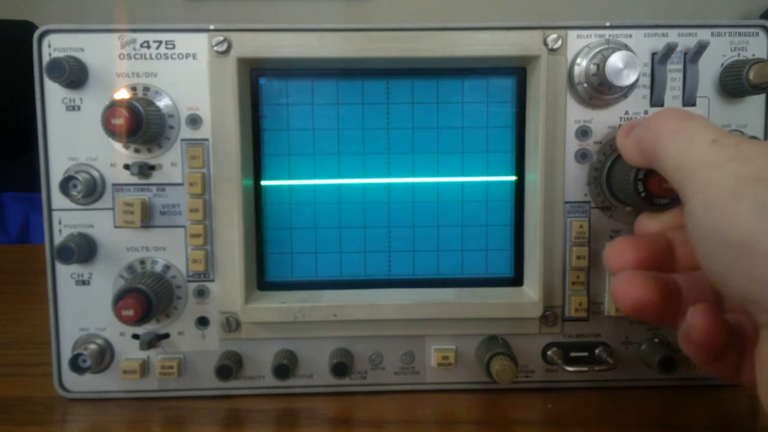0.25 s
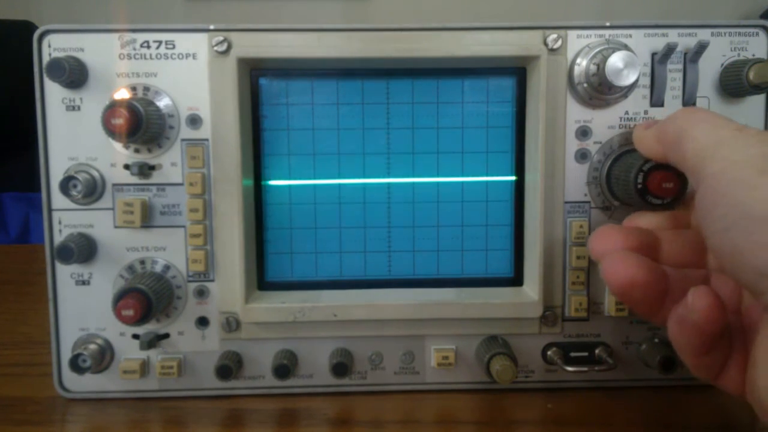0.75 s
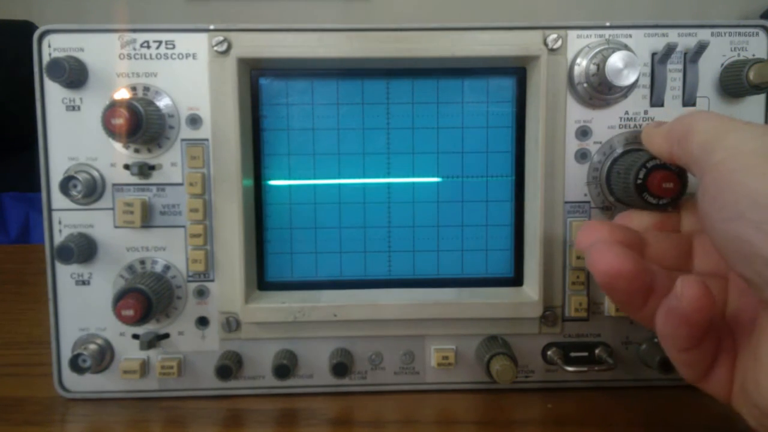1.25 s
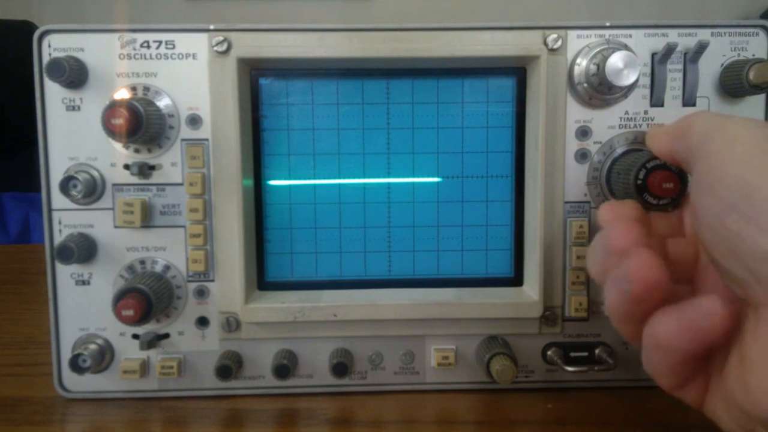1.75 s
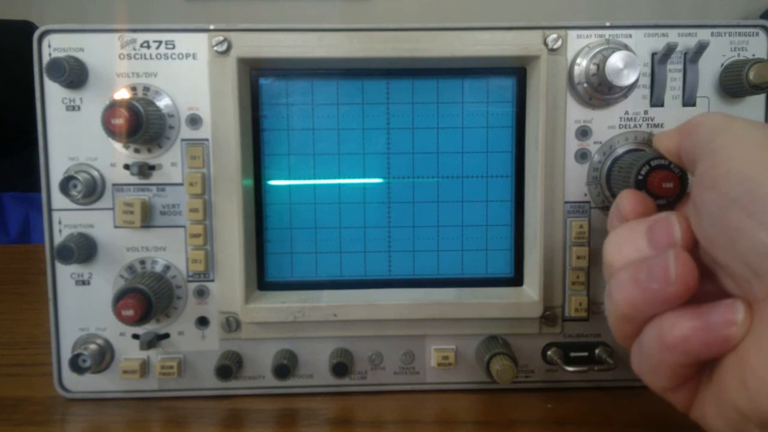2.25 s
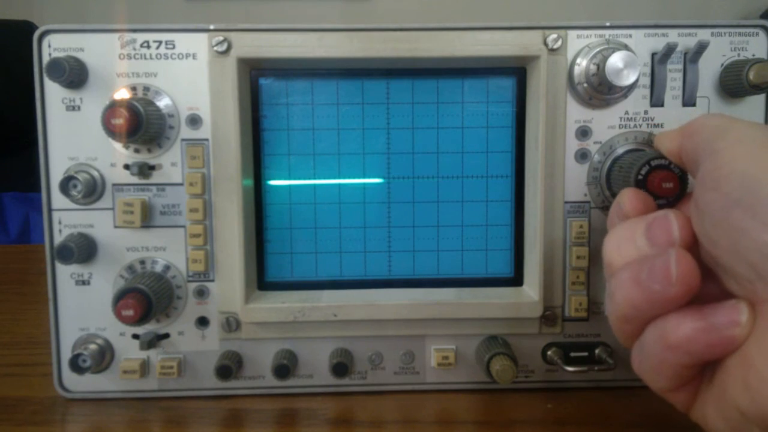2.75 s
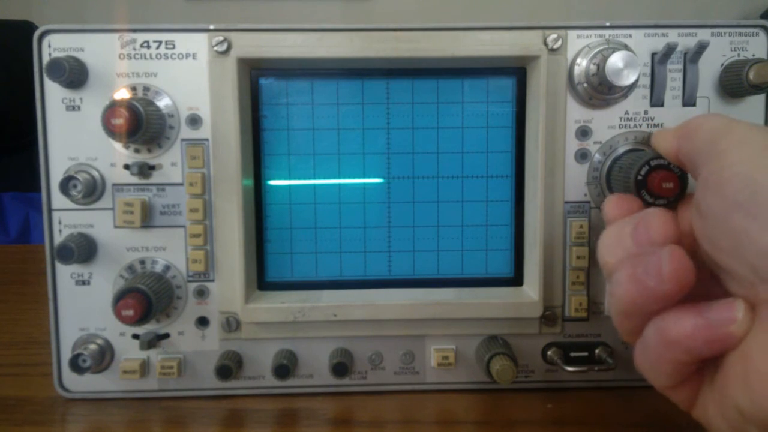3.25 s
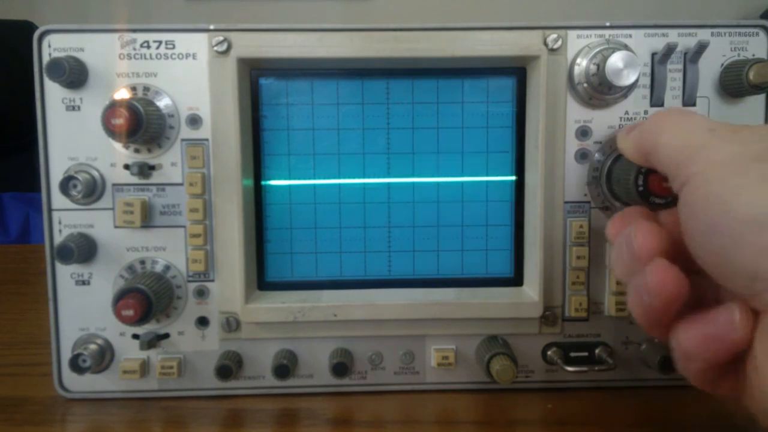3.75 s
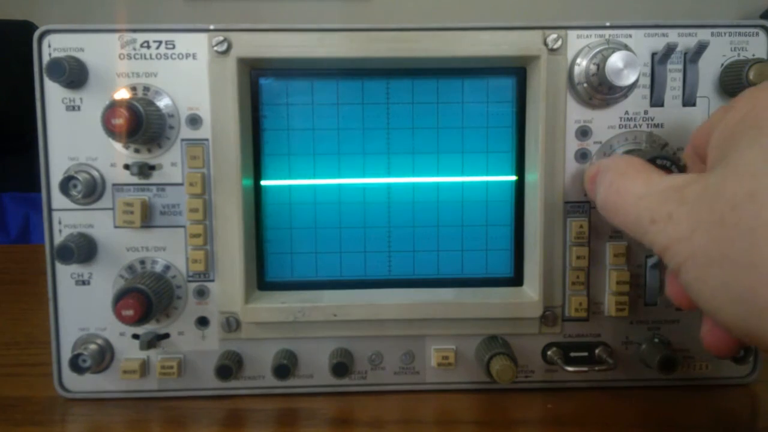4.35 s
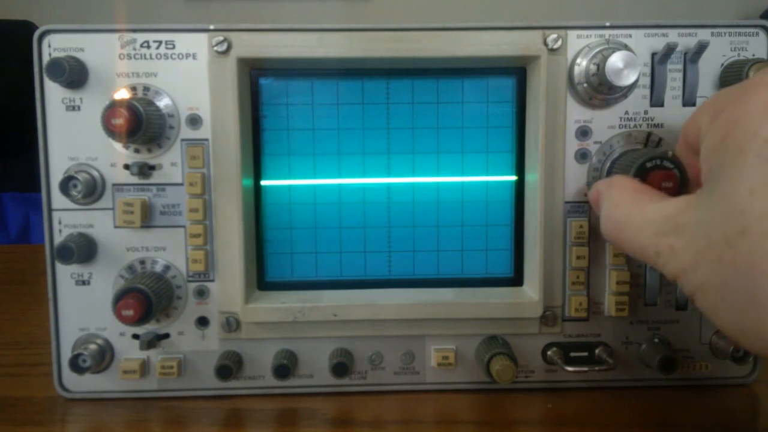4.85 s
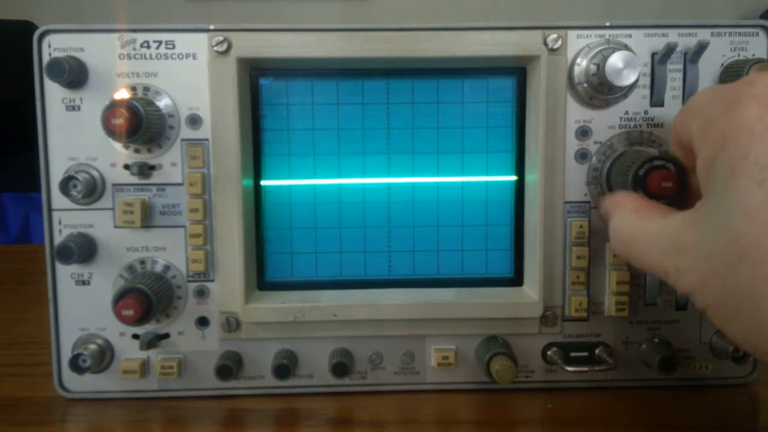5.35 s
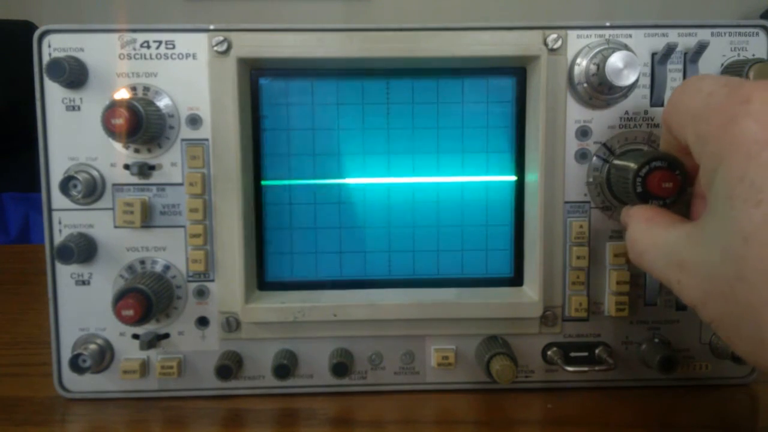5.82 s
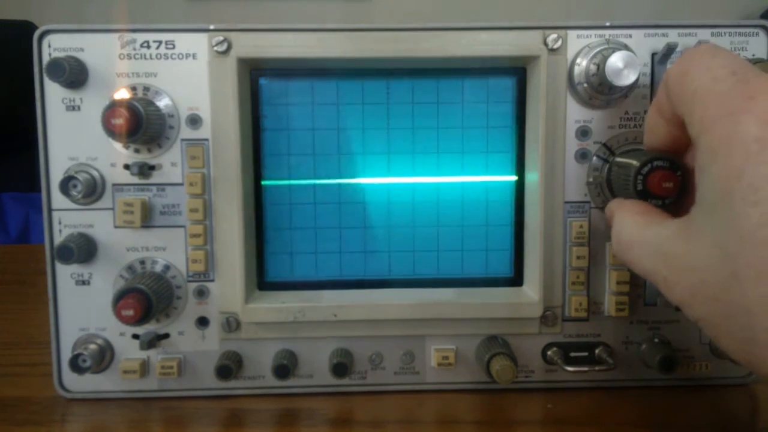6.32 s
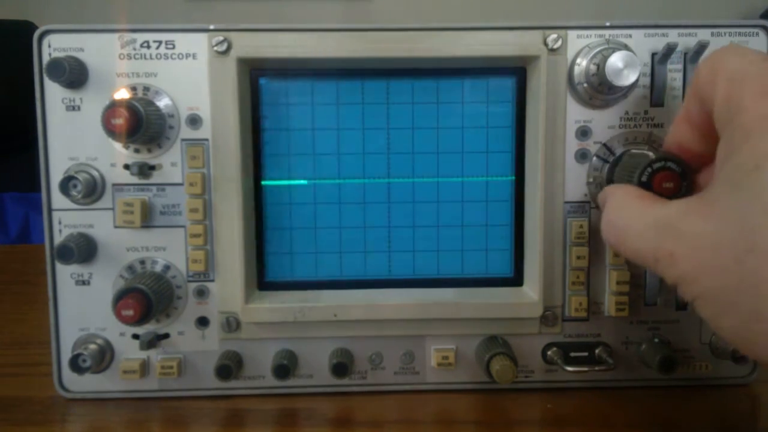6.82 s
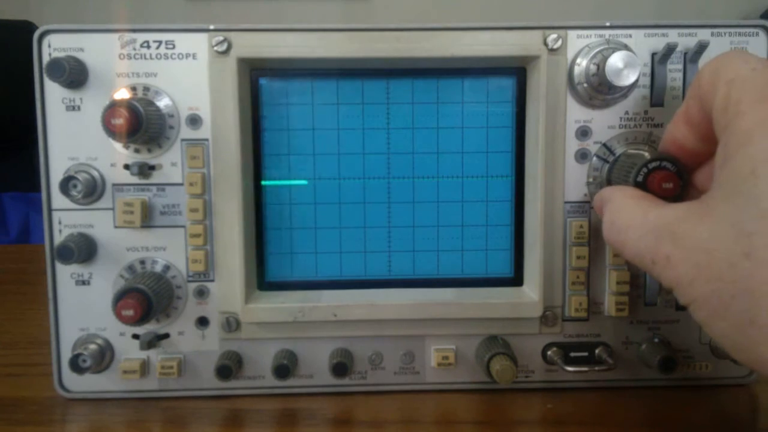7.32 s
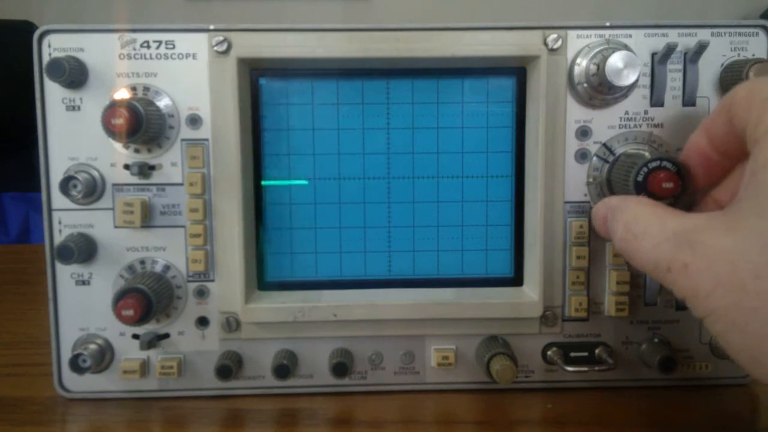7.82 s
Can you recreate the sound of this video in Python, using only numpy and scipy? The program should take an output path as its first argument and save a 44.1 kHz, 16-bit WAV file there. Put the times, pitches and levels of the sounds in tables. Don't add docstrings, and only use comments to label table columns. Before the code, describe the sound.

A soft, steady fan hum with gentle airy noise runs throughout, and a pendulum clock ticks faintly across a small room about every half second. Close to the microphones, a stepped knob snaps hard and bright at 0.1, 0.3, 0.5, 0.8 and 1.1 seconds, the first leaving a brief springy metallic ring, then once more at 2.2. A gap follows, with tiny finger ticks around 3.3 to 3.7. From 3.7 to 4.3 seven steps run back quickly, each a short rattle of spring and contacts, ringing the panel and thumping the hollow case. Slower, similar clunky clicks continue from 4.5 to 5.9, irregularly two to five a second. A softer click comes at 6.2, light fumbling taps near 6.5, then two quick, thinner snaps around 6.8. Only small nail and knob ticks remain at 7.3 to 7.6, over the fan and clock until the end at about 8 seconds.

```python
import sys
import numpy as np
from scipy import signal
from scipy.fft import rfft, irfft, next_fast_len
from scipy.io import wavfile
from scipy.ndimage import uniform_filter1d, map_coordinates

SR = 44100
rng = np.random.default_rng(int(sys.argv[2]) if len(sys.argv) > 2 else 0)


def attenuation_scalar(level_db):
    decades = np.asarray(level_db, float) / 20
    return 10 ** decades


def waveform_to_disk(signal):
    frames = np.transpose(np.atleast_2d(signal))
    scaled = np.clip(frames, -1, 1) * 32767
    samples = np.round(scaled).astype(np.int16)
    wavfile.write(sys.argv[1], SR, samples)


N = 356328
LONG = 16384
LEAD_MS = 18

# pitch_hz, width_hz, level_db
SPRING = [(2210, 24, 0), (2290, 20, 0), (2380, 24, -2)]


def unit(x):
    return x / np.sqrt(np.mean(x ** 2) + 1e-20)


def peak(x, db):
    return x * attenuation_scalar(db) / np.sqrt(uniform_filter1d(x ** 2, size=88).max())


def along(points, hz):
    f, v = np.transpose(points)
    return np.interp(np.log(hz + 1), np.log(f + 1), v)


def filtered(x, response):
    m = next_fast_len(x.shape[-1] + 8192)
    spectrum = rfft(x, m) * response(np.fft.rfftfreq(m, 1 / SR))
    return irfft(spectrum, m)[..., :x.shape[-1]]


def impulse(s):
    return 1. * (np.arange(LONG) == round(s * SR))


def modes(table, scatter_db=0):
    gains = attenuation_scalar(scatter_db * rng.standard_normal(len(table)))

    def response(f):
        total = 0
        for k, (centre, width, db) in enumerate(table):
            resonance = 1j * f * width / (centre * centre - f * f + 1j * f * width)
            total = total + (-1) ** k * gains[k] * attenuation_scalar(db) * resonance
        return total
    return response


def spread(pair, alike):
    def mid_side(hz):
        turn = np.arccos(np.clip(along(alike, hz), -1, 1)) / 2
        return np.array([np.cos(turn), np.sin(turn)])
    mid, side = filtered(pair, mid_side)
    return np.array([mid + side, mid - side])


def add(track, s, sound):
    start = round(s * SR)
    track[:, max(start, 0):start + LONG] += sound[:, max(-start, 0):max(N - start, 0)]


def room(x, plain, wet_db, early_db, gap_s=0.0039, live=1):
    # pitch_hz, t60_s
    reverb = [(150, 0.59), (400, 0.14), (1040, 0.28), (2760, 0.27), (7280, 0.25), (10000, 0.22),
              (12500, 0.19), (16000, 0.18)]
    # pitch_hz, likeness
    tail_alike = [(100, 0.45), (500, 0.93), (2000, 0.99), (5000, 0.9), (9000, 0.39), (14000, .4)]
    # delay_ms, level_db
    walls = [(9.6, -6.5), (13, -15), (16.5, -6.5), (19, -24), (23, -5), (28, -15.5)]
    hz, t, z = signal.stft(rng.standard_normal((2, LONG)), SR, nperseg=256)
    t60 = live * along(reverb, hz)[:, None]
    decay = attenuation_scalar(-60 * t / t60) + attenuation_scalar(-24 - 60 * t / (2.2 * t60))
    tail = signal.istft(z * decay, SR, nperseg=256)[1][:, :LONG]
    tail = tail * (1 - np.exp(-(np.arange(LONG) / SR / gap_s) ** 3))
    tail = spread(tail / np.linalg.norm(tail[0]), tail_alike)
    taps_out = np.zeros((2, SR // 20))
    for ms, db in walls:
        at = round(ms * SR / 1000) + rng.integers(0, 2, size=2) * (ms > 12)
        taps_out[[0, 1], at] = attenuation_scalar(db + early_db + 1.5 * rng.standard_normal(2))
    echoes = signal.fftconvolve(x[None], taps_out, axes=1)[:, :LONG]
    diffuse = signal.fftconvolve(plain[None], tail, axes=1)[:, :LONG]
    return x + echoes + attenuation_scalar(wet_db) * diffuse


def fan():
    # pitch_hz, level_db (per Hz)
    air_colour = [(15, -56.5), (25, -23), (114, -16.5), (169, -14.5), (187, -12.5), (400, -7), (433, -17),
                  (548, -10), (712, -12), (791, -7.5), (855, -14), (1230, -19.5), (2630, -36.5),
                  (13000, -50.5)]
    # pitch_hz, width_hz, level_db
    duct = [(129, 12, -7), (260, 6.7, -9), (370.3, 59, 4), (795.6, 8.3, 6), (1270, 35, -8)]
    # pitch_hz, left-right likeness
    fan_alike = [(60, 0.63), (130, 0.86), (290, 0.96), (640, 0.98), (1410, 0.95), (3100, 0.71),
                 (6820, 0.19), (15000, 0.06)]
    air = spread(rng.standard_normal((2, N)), fan_alike)
    air = unit(filtered(air, lambda hz: attenuation_scalar(along(air_colour, hz)) / (1 + (hz / 13000) ** 24)))
    hum = spread(rng.standard_normal((2, N)), fan_alike)
    hum = unit(filtered(hum, lambda hz: modes(duct)(hz) / (1 + (hz / 1500) ** 4)))
    drift = map_coordinates(rng.standard_normal(40), [np.arange(N) * 4 / SR])
    return attenuation_scalar(-52 + 0.21 * drift) * (attenuation_scalar(-6.5) * air + attenuation_scalar(-5.5) * hum)


def clock():
    # first_s, period_s, level_db
    beats = [
        (.3882, .9672, -58),
        (.8909, .9654, -58),
    ]
    trims = [5.5, 7.5]
    # pitch_hz, width_hz, level_db
    tick = [(2200, 330, -7.5), (2500, 270, 7), (4620, 550, 7.5), (5700, 520, 2), (6650, 400, 10),
            (9400, 700, 1.5)]
    # pitch_hz, width_hz, level_db
    tock = [(2132, 91, -11), (2500, 600, -1.5), (3730, 190, 3), (4440, 340, -4), (5720, 200, 3.5),
            (6610, 390, -2), (8440, 500, -6.5), (10045, 150, -3.5), (13520, 550, -17)]
    out = np.zeros((2, N))
    for (first_s, period_s, db), trim_db, table in zip(beats, trims, (tick, tock)):
        for s in np.arange(first_s, N / SR, period_s):
            ring = modes(table)
            beat = filtered(impulse(0), lambda f: ring(f) * np.sqrt(np.abs(ring(f))))
            beat = peak(beat, db + trim_db)
            add(out, s, room(beat, beat, wet_db=8.0, early_db=-6.0, gap_s=0.0027, live=0.72))
    return out


def thump(scatter_db=0):
    # pitch_hz, width_hz, level_db
    case_modes = [(122, 41, -8.5), (205, 40, -4), (265, 17, 2), (315.6, 21.5, 3), (405.3, 32, 3),
                  (474, 20, -0.5), (546.6, 40, 0.5), (679, 27, -3), (798, 74, -12.5), (970, 53, -22)]
    body = modes(case_modes, scatter_db)
    return lambda f: body(f) * (1j * f / (105 + 1j * f)) ** 3


def taps():
    # start_s, level_db, pitch_hz, second_pitch_hz, room_db
    touches = [(-.13, -23, 5630, 3070, 2.5), (1.618, -72, 5370, 4000, -6), (3.2661, -43.5, 8500, 2400, 1.5),
               (3.268, -48.5, 5500, 4040, -4), (3.607, -66, 2550, 3600, 3), (3.667, -47, 6900, 1550, -1.5),
               (6.4951, -61.5, 3620, 5300, 14.5), (6.504, -55, 1780, 2870, 8),
               (6.5167, -48, 9440, 8500, 6.5), (6.526, -64.5, 5160, 2600, 17.5),
               (6.566, -55, 3670, 5400, -20), (7.282, -42.5, 5950, 1770, -9),
               (7.3907, -55.5, 2840, 895, -9.5), (7.5893, -51.5, 5550, 8100, -4),
               (7.6075, -43.5, 3900, 1600, -20)]
    body_hz, body_db = 2600, -2
    out = np.zeros((2, N))
    for s, db, hz, second_hz, wet_db in touches:
        first = modes([(hz, .2 * hz, 0)])
        second = modes([(second_hz, .3 * second_hz, 0)])
        lift = np.sqrt(hz / second_hz)

        def nail(f):
            broad = attenuation_scalar(-34.0) * f / (f + 1000) / (1 + (f / 7000) ** 4)
            return (first(f) ** 2 + lift * second(f) ** 2 + broad) / (1 + 1j * f / 11000) ** 3
        click = peak(filtered(impulse(0), nail), db - .7)
        knock = peak(filtered(impulse(0), thump()), db - 4.5)
        knob = modes([(body_hz, 1.9 * body_hz, 0)])
        body = filtered(impulse(0), lambda f: knob(f) ** 2)
        body = attenuation_scalar(body_db) * body * np.linalg.norm(click) / np.linalg.norm(body)
        click = click + .3 * body
        plain = 0.47 * click + body + knock
        add(out, s + 0.0009, room(click + knock, plain, wet_db, early_db=wet_db - 7.5, live=0.86))
    return out


def twang():
    # start_s, level_db
    twangs = [
        (.079, -34.5),
    ]
    out = np.zeros((2, N))
    for s, db in twangs:
        ring = peak(filtered(impulse(0), modes(SPRING)), db)
        add(out, s, room(ring, ring, wet_db=4, early_db=-6))
    return out


def impacts(run_up_ms, first_db, between_db):
    gap_ms, uneven_ms, uneven_db = 1.7, 0.083, 2.5
    touch_db, rebound_ms, rebound_db = -16, 1.06, -2
    chance = rng.standard_normal((2, 10))
    gaps = int(np.clip(round(run_up_ms / gap_ms), 1, 9))
    ms = np.linspace(-run_up_ms, 0, gaps + 1)
    ms[1:-1] += uneven_ms * chance[0, 1:gaps]
    db = between_db + uneven_db * chance[1, :gaps + 1]
    db[0] += first_db - between_db
    db[-1] = 0
    touch = [(-run_up_ms - gap_ms, touch_db)]
    rebounds = [(rebound_ms, rebound_db), (2 * rebound_ms, 2 * rebound_db)]
    return [(LEAD_MS + at, level) for at, level in list(zip(ms, db)) + touch + rebounds]


def rattle(hits, rise_ms=.85, fall_ms=1.4):
    ms = np.arange(LONG) / SR * 1000
    power = 0
    for at, db in hits:
        rise = -((ms - at) / rise_ms) ** 2
        fall = -(np.abs(ms - at) / fall_ms) ** 1.13
        power = power + attenuation_scalar(2 * db) * np.exp(2 * np.where(ms < at, rise, fall))
    return np.sqrt(power) * rng.standard_normal(LONG)


def detent(db, run_up_ms, panel_db, case_db, first_db, between_db, wet_db, spring_db):
    # pitch_hz, level_db (per Hz)
    snap_colour = [(880, -11.5), (1500, -10), (2090, -11), (3450, -3.5), (4170, -9.5), (5200, -5.5),
                   (9310, -5), (10100, -7), (12500, -21.5), (15700, -16), (16500, -54.5)]
    # pitch_hz, width_hz, level_db
    panel_modes = [(1267, 28, -6.5), (1435, 16, 8), (1504, 40, 1), (1895, 28, 2), (2300, 54, -1.5),
                   (2400, 23, 5.5), (2756, 78, 1.5), (3000, 94, -2), (3500, 100, -5.5), (3650, 150, -1)]
    # pitch_hz, width_hz, level_db
    bench = [(45.33, 31, 0)]
    chatter = .35
    beams = 0.3
    blows = rattle(impacts(run_up_ms, first_db, between_db))
    detune = 1 + .012 * rng.standard_normal(len(panel_modes))
    detuned = [(c * d, 2.1 * w, g) for (c, w, g), d in zip(panel_modes, detune)]
    ring = modes(detuned, scatter_db=1.2)

    def panel(hz):
        return attenuation_scalar(panel_db + 3.0) * ring(hz)

    def front(hz):
        return attenuation_scalar(along(snap_colour, hz)) / (1 + (400 / (hz + 1)) ** 4) + panel(hz)

    strike = impulse(LEAD_MS / 1000)
    push = np.linalg.norm(blows) * strike - (1 - chatter) * blows
    snap = peak(filtered(blows, front) + filtered(push, panel), db - 2.0)
    late_strike = np.roll(strike, round(.0015 * SR))
    case = peak(filtered(late_strike, thump(scatter_db=1.1)), db + case_db + 2.0)
    spring = peak(filtered(strike, modes(SPRING)), db + spring_db - 5.0)
    bounce = peak(filtered(strike, modes(bench)), db - 34)
    bounce = bounce * (1 + .6 * rng.standard_normal() * np.array([[1], [-1]]))
    plain = filtered(strike, lambda hz: front(hz) - beams * panel(hz))
    plain = plain * np.linalg.norm(snap) / np.linalg.norm(plain) + attenuation_scalar(2.5) * case
    plain = plain + attenuation_scalar(-12.5) * snap
    return room(snap + case, plain, wet_db, early_db=-5.0) + spring + bounce


def detents():
    # hardest_impact_s, peak_db, run_up_ms, panel_db, case_db
    steps_up = [(0.077, -15, 0.75, -22.5, -15.5), (0.2981, -15.5, 3.8, -22, -15.5),
                (0.5092, -15, 0.76, -12, -16), (0.7727, -15, 0.89, -13, -15.5),
                (1.0613, -16, 2.7, -11.5, -14), (2.2107, -18, 3.7, -17.5, -13),
                (6.2256, -30, 0.41, -3.5, -6), (6.7775, -23.5, 2.1, -13.5, -19),
                (6.8495, -27.5, 1.1, -7, -24.5)]
    # hardest_impact_s, peak_db, run_up_ms, panel_db, case_db
    steps_down = [(3.8263, -21.5, 6.5, -13.5, -11.5), (3.8941, -24, 9.8, -6.5, -8.5),
                  (3.958, -25, 8, -8.5, -10), (4.037, -22.5, 5.6, -6.5, -12), (4.1388, -26.5, 8, -6, -9.5),
                  (4.2279, -24.5, 7.4, -6.5, -10), (4.3184, -23, 8, -4.5, -9.5),
                  (5.0702, -22.5, 6.2, -15.5, -6.5), (5.2950, -21, 5, -7, -11.5),
                  (5.7663, -21, 4.6, -5, -8.5), (5.8914, -18.5, 2.6, -11.5, -11.5)]
    # hardest_impact_s, peak_db, run_up_ms, panel_db, case_db
    steps_eased = [(3.731, -19.5, 5.6, -5.5, -9.5), (4.4571, -23, 6.5, -9, -10),
                   (4.6621, -21, 7.6, -9.5, -8), (4.8517, -20.5, 9, -7, -7.5),
                   (5.4796, -19.5, 4.9, -10, -11), (5.6083, -19.5, 4.5, -13.5, -9)]
    # pitch_hz, level_db
    knob_side = [(200, 0.5), (380, 0.4), (600, -4), (800, -2), (1290, 0.25), (8000, -0.26)]
    up = (-4.5, -7, -2.17, -23.5)
    down = (-2, -2.5, -2.37, -13)
    eased = (-11, -1, -1.9, -24.5)
    out = np.zeros((2, N))
    for steps, kind in ((steps_up, up), (steps_down, down), (steps_eased, eased)):
        for s, *levels in steps:
            add(out, s - LEAD_MS / 1000, detent(*levels, *kind))
    return filtered(out, lambda hz: attenuation_scalar(along(knob_side, hz) * np.array([[.5], [-.5]])))


def scene():
    return fan() + clock() + taps() + twang() + detents()


def low_pass(x):
    return signal.sosfilt(signal.butter(12, 16800, fs=SR, output="sos"), x)


def record(dry):
    uneven = dry * attenuation_scalar(np.array([[-.2], [.2]]))
    heard = filtered(uneven, lambda hz: (hz < 16700) * attenuation_scalar(-20 * (hz > 15850)))
    return low_pass(heard)


dry = scene()
out = record(dry)
waveform_to_disk(out)
```